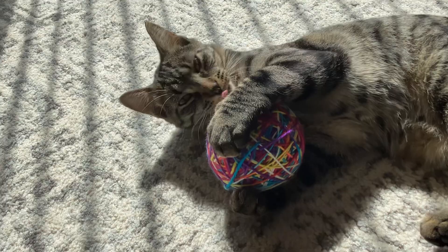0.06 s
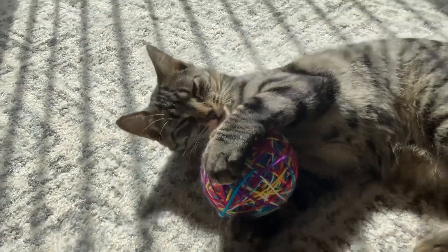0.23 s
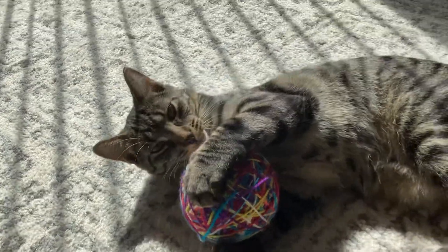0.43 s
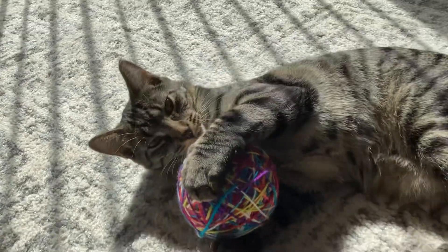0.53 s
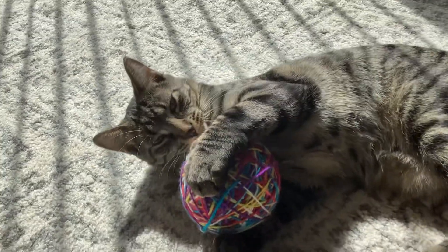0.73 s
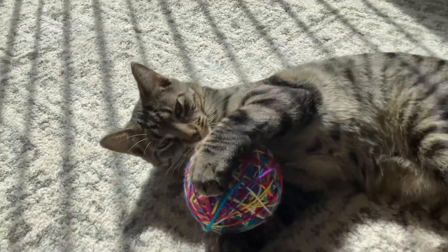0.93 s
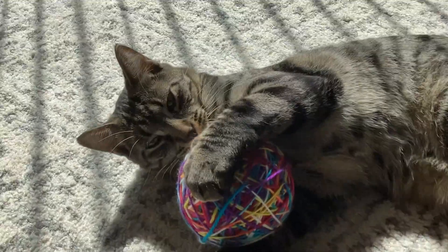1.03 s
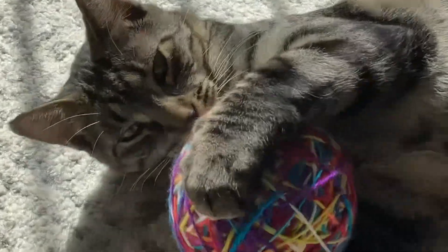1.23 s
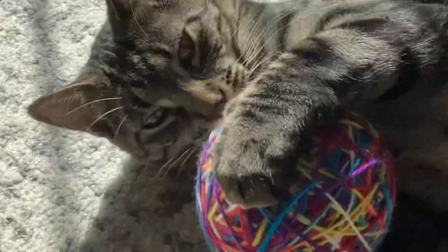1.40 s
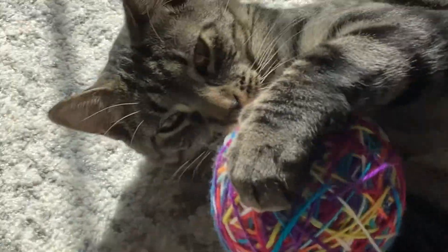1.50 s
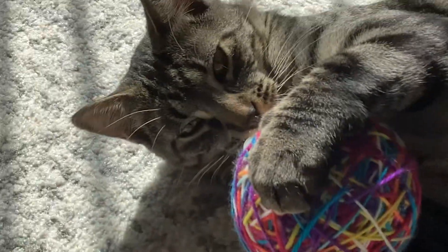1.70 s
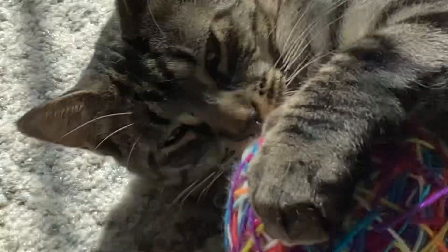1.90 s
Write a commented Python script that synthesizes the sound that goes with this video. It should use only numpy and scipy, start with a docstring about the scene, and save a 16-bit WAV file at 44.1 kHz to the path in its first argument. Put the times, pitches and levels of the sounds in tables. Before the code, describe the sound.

Close scuffing and light taps of a cat handling a yarn ball, with one sharp knock.

```python
"""A cat lies close by on a rug with a ball of yarn, over the low hum and hiss of a quiet room.
First come light taps and a short bout of scuffing, with one sharp knock near 0.4 s. Taps and scuffs
excite one solid body, perhaps the floor; the taps travel as bending waves, treble first and bass last.
Sharper taps ring briefly throughout; a dull bump near 1 s is followed by faint taps."""
import sys
import numpy as np
from scipy import signal
from scipy.fft import rfft, irfft
from scipy.io import wavfile
from scipy.ndimage import uniform_filter1d

SR = 44100
rng = np.random.default_rng(int(sys.argv[2]) if len(sys.argv) > 2 else 0)


def generate_wav(sig):
    """Save sig (samples, or channels by samples) to the path in sys.argv[1] as 16-bit PCM at SR."""
    pcm = np.round(np.clip(np.atleast_2d(sig).T, -1, 1) * 32767).astype(np.int16)
    wavfile.write(sys.argv[1], SR, pcm)


N = 85995


def undb(db):
    """Amplitude ratio of a level in decibels."""
    return 10 ** (np.asarray(db) / 20)


def unit(x):
    """Normalisation to an rms of 1."""
    return x / np.sqrt(np.mean(x ** 2))


def bins():
    """Frequency of each Fourier bin in Hz, at least 1."""
    return np.maximum(np.arange(N // 2 + 1) * SR / N, 1)


def response(points):
    """Minimum-phase filter through (Hz, dB) points: folding the cepstrum makes it causal."""
    hz, db = np.array(points, float).T
    gain = undb(np.interp(np.log(bins()), np.log(hz), db))
    cepstrum = irfft(np.log(gain), N)
    cepstrum[1:N // 2] *= 2
    cepstrum[N // 2 + 1:] = 0
    return np.exp(rfft(cepstrum))


def wander(rate_hz):
    """Slow fluctuation of rms 1: random steps smoothed by two moving averages."""
    hold = int(SR / rate_hz)
    steps = np.repeat(rng.standard_normal(N // hold + 1), hold)
    return unit(uniform_filter1d(uniform_filter1d(steps, hold), hold)[:N])


def noise(colour):
    """White noise shaped by a frequency response, at an rms of 1."""
    return unit(irfft(rfft(rng.standard_normal(N)) * colour, N))


def resonance(hz, decay_s, db):
    """Response of a damped oscillator; db is its gain at resonance."""
    return undb(db) / (1 + 1j * np.pi * decay_s * (bins() - hz ** 2 / bins()))


def diffuse_ring(t, decay_s):
    """Spectrum of a diffuse ring: exponentially decaying noise of unit energy."""
    tail = rng.standard_normal(N) * np.exp(-t / decay_s)
    return rfft(tail / np.linalg.norm(tail))


def room(t):
    """Superposition of broadband rumble and hiss, narrowband whines and a wavering appliance hum."""
    # Each row: frequency in Hz, relative level in dB.
    air_colour = [(25, -48), (45, -29), (75, -6), (135, -7), (175, -11.5), (255, -11), (360, -21.5),
                  (650, -20.5), (900, -26), (2600, -29), (3800, -33), (4600, -39), (5800, -34), (7200, -37),
                  (8500, -35.5), (10100, -27.5), (11200, -32), (12500, -41.5), (13400, -57), (16000, -70)]
    # Each row: centre in Hz, bandwidth in Hz, rms level in dB.
    whine_bands = [(2040, 82, -74), (3143, 20, -76.5), (4044, 38, -75.5), (5550, 63, -78.5),
                   (6200, 42, -78.5), (8830, 58, -75.5), (9350, 40, -77), (10120, 300, -69.5),
                   (12160, 200, -85)]
    # Each row: frequency in Hz, rms level in dB.
    hum_tones = [(84, -62), (119.5, -56.5), (220.5, -59)]
    air = undb(-53.5) * noise(response(air_colour))
    whines = sum(undb(db) * noise(1 / (1 + (2 * (bins() - hz) / width) ** 2))
                 for hz, width, db in whine_bands)
    hum = np.zeros(N)
    for hz, db in hum_tones:
        amplitude = np.sqrt(2) * undb(db - wander(8.8))  # wavers by about 1 dB
        hum += amplitude * np.sin(2 * np.pi * hz * t + wander(7.04))
    return air + whines + hum


def body():
    """Transfer function of the solid body: a broad colour with short, hollow normal modes."""
    # Each row: frequency in Hz, gain in dB.
    colour = [(45, -31.5), (100, -15), (230, -0.5), (450, -2.5), (700, -2.5), (1200, -4), (2100, 0.5),
              (3000, -8), (4600, -6.5), (7500, -6), (10800, -7.5), (12500, -16), (16000, -34.5)]
    # Each row: frequency in Hz, decay time in seconds, gain in dB.
    modes = [(237, 0.021, -8), (506, .008, -2.5), (1043, 0.0054, 1.5), (1280, 0.0049, -5),
             (1780, 0.0066, -2), (2105, 0.0069, -18.5), (3330, 0.0035, -2), (6570, 0.0026, -16.5)]
    return response(colour) * (1 + sum(resonance(*mode) for mode in modes))


def taps(t):
    """Dispersion: bending waves speed up as the root of frequency, so each tap's bass arrives last."""
    # Each row: start in seconds, bass, middle and treble gains in dB, group delay at 1 kHz in ms,
    # relative rattle level in dB, cutoff in Hz.
    contacts = [(.0380, 10, -9.5, -16.5, 1.73, -2, 7200), (.1150, 8.5, -13, -57, 4.0, -3, 2480),
                (0.1848, -8, -11, -25, 1.7, 0, 4000), (.2000, -3, -14, -32, 1.5, -4, 2500),
                (0.2115, 14.5, -6.5, -2.5, 3.7, 3, 14000), (0.2328, 0.5, 0.5, -2, 1.92, -3, 9050),
                (0.2715, -4, 3.5, 6.5, 1.5, -3, 5000), (0.384, 14.5, -1, 13, 2.48, -34, 15100),
                (0.3867, -14.5, 10, 7, 0.79, -13, 7900), (0.4408, 7.5, 11, 0.5, 1.36, -2, 9100),
                (0.8981, -2, -18, -30, 1.43, -5, 4000), (0.922, -13, -9, -34, 1.07, -1, 3000),
                (0.9345, 2, -8, -14.5, 1.28, -3.5, 6540), (0.9889, -18, -21, -16, 0.66, -10, 9500),
                (0.9965, -6, -11.5, -32, 1.36, 2.5, 7000), (1.0010, -16, -21, -19, 0.96, -20, 7600),
                (1.1596, -28, -12, -29, 1.39, -19, 6000), (1.1632, 5.5, -2.5, -21.5, 1.485, -29, 2480),
                (1.439, -4, -3, -26, 2.01, -5.5, 3000), (1.8020, -4, -19, -21, 1.26, -3.5, 7000),
                (1.8192, -4, -11.5, -18, 1.16, -7, 8100), (1.8262, 3, -3, -8, 1.3, 1, 10000),
                (1.85, -13, -16.5, -27, 1.4, -1, 3000)]
    # The centres of bass, middle and treble in Hz.
    centres_hz = (292, 1310, 5200)
    hz, spectrum = bins(), 0
    slowness = np.sqrt(1000 / hz)  # relative to 1 kHz
    rattle_band = hz ** 2 / (hz ** 2 + 700 ** 2)
    for start, *gains_db, lag_ms, rattle_db, cutoff_hz in contacts:
        force = response(list(zip(centres_hz, gains_db)))
        softness = 1 / np.sqrt(1 + (hz / cutoff_hz) ** 8)  # soft contacts lose their top
        rattle = undb(rattle_db) * rattle_band * diffuse_ring(t, decay_s=0.0017)
        phase_delay = 2 * lag_ms / 1000 * slowness  # twice the group delay
        travel = np.exp(-2j * np.pi * hz * (start + phase_delay))
        spectrum += force * softness * travel * (1 + rattle)
    high_ring = resonance(hz=5900, decay_s=0.0019, db=3.5)  # only sharp contacts reach this high
    return irfft(spectrum * body() * (1 + high_ring), N)


def tap_rings(t):
    """Free vibration: the brief, bright ring of the sharper taps and ticks, each a damped sinusoid."""
    # Each row: start in seconds, frequency in Hz, decay time in seconds, gain in dB.
    rings = [(.0382, 5750, .0006, -31), (.2126, 6100, .0025, -28), (.2334, 4620, 0.0015, -23),
             (.2722, 3950, .0022, -27), (.9886, 7460, 0.0004, -32.5), (1.0010, 5900, 0.00086, -32),
             (1.4636, 8300, 0.00054, -33), (1.8267, 5400, 0.00065, -29.5)]
    rise_s = 0.00017
    out = np.zeros(N)
    for start, hz, decay_s, db in rings:
        age = np.maximum(t - start, 0)
        envelope = (1 - np.exp(-age / rise_s)) * np.exp(-age / decay_s)
        out += undb(db) * envelope * np.sin(2 * np.pi * hz * age)
    return out


def scuffs(t):
    """Stick-slip friction: thousands of fibres catch and slip, driving the body in swelling strokes."""
    # Each row: time of greatest pressure, rise and fall in seconds, bass, middle and treble levels in dB.
    strokes = [(.2130, .004, .005, -44, -44, -52), (.241, 0.0086, 0.01, -33.5, -35.5, -36.5),
               (0.26, 0.0091, 0.022, -66, -51.5, -38.5), (0.284, 0.0079, 0.019, -29.5, -29, -37.5),
               (0.319, 0.012, 0.019, -39.5, -42, -47), (0.349, 0.0046, 0.0082, -37, -38, -49.5),
               (.388, 0.012, 0.019, -48.5, -47, -40), (0.428, .019, 0.018, -44, -30, -35),
               (.463, 0.019, 0.01, -36, -45.5, -43), (.505, 0.033, .020, -58.5, -60, -57.5),
               (0.548, 0.018, 0.011, -44, -44.5, -47), (0.634, 0.04, 0.031, -44, -38.5, -44),
               (.668, 0.0067, 0.005, -45, -35, -48), (.700, 0.017, 0.023, -62, -63, -65),
               (0.799, 0.032, 0.039, -50.5, -55, -76), (1.428, .004, .018, -58, -63, -57),
               (1.469, .005, 0.0082, -45, -51.5, -62)]
    # The bass-middle and middle-treble crossovers in Hz.
    crossovers_hz = (640, 2420)
    slips_per_s, scatter_db = 4500, 2.5
    slips = (rng.random(N) < slips_per_s / SR) * rng.choice([-1, 1], N)
    strengths = undb(scatter_db * rng.exponential(size=N))
    rub = rfft(slips * strengths) * body()
    low, high = (1 / (1 + (bins() / hz) ** 6) for hz in crossovers_hz)
    bands = [rfft(unit(irfft(rub * share, N))) for share in (low, high - low, 1 - high)]
    ring_gain = undb(-6)
    out = np.zeros(N)
    for peak, rise, fall, *levels_db in strokes:
        width_s = np.where(t < peak, rise, fall)
        pressure = np.exp(-np.abs((t - peak) / width_s) ** 1.49)
        # Every stroke rubs a new spot, which rings in its own way.
        spot = (1 + ring_gain * diffuse_ring(t, decay_s=0.0042)) / np.hypot(1, ring_gain)
        friction = sum(undb(db) * band for db, band in zip(levels_db, bands))
        out += pressure * irfft(spot * friction, N)
    return out


def bumps(t):
    """Soft, heavy impacts excite only low frequencies: a few cycles of a sinking tone."""
    # Each row: start in seconds, gain in dB, initial and final frequency in Hz, decay time in seconds.
    impacts = [(.3490, -33.5, 232, 130, 0.013), (.4620, -31, 480, 380, .010),
               (0.9734, -19, 303, 53.4, .014), (1.1735, -46, 200, 129, 0.027),
               (1.4417, -31.5, 410, 343, 0.0078)]
    rise_s, sink_s = 0.0011, 0.01
    out = np.zeros(N)
    for start, db, first_hz, last_hz, decay_s in impacts:
        age = np.maximum(t - start, 0)
        hz = last_hz + (first_hz - last_hz) * np.exp(-age / sink_s)
        phase = 2 * np.pi * np.cumsum(hz * (age > 0)) / SR
        envelope = (1 - np.exp(-age / rise_s)) * np.exp(-(age / decay_s) ** 2)
        out += undb(db) * envelope * np.sin(phase)
    return out


def scene():
    """Linear superposition of all sources at one microphone."""
    t = np.arange(N) / SR
    return (room(t) + scuffs(t) + taps(t) + tap_rings(t) + bumps(t))[None]


def record(dry):
    """Band limiting: a steep elliptic low-pass filter removes the highest treble."""
    cutoff_hz = 16200
    return signal.sosfilt(signal.ellip(8, .2, 70, cutoff_hz, fs=SR, output="sos"), dry)


dry = scene()
out = record(dry)
generate_wav(out)
```